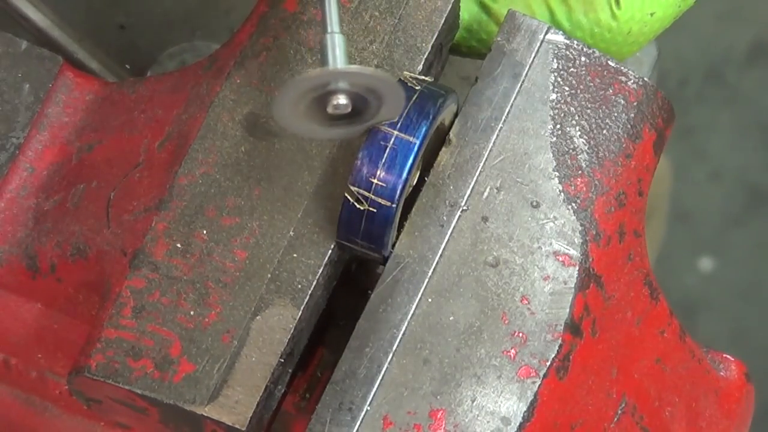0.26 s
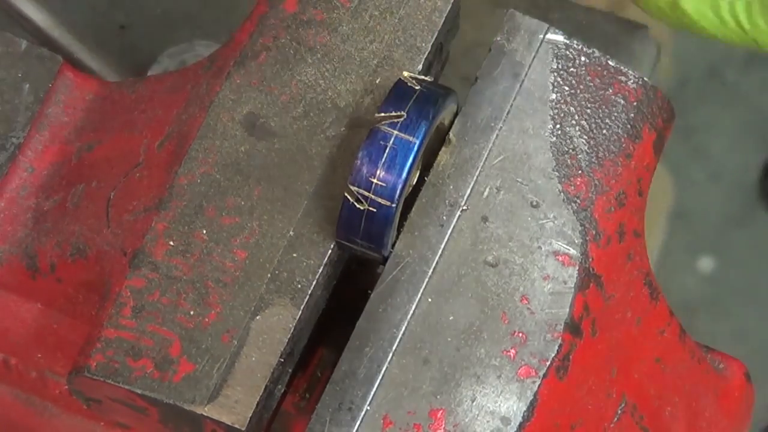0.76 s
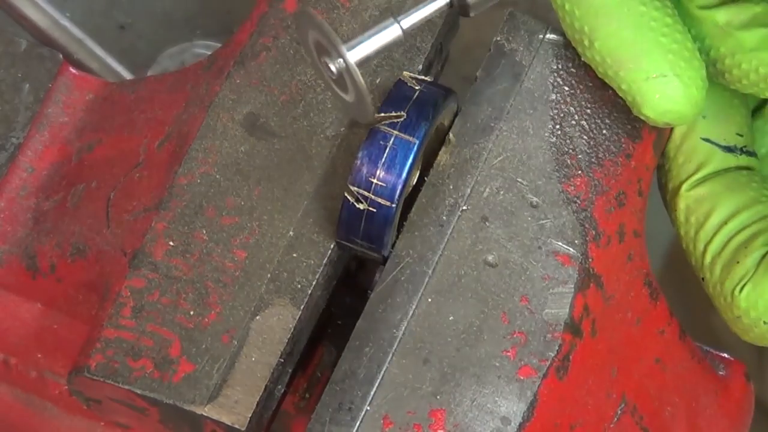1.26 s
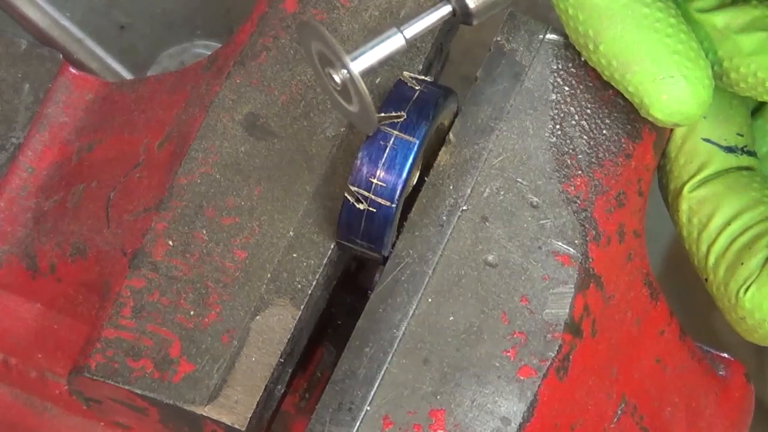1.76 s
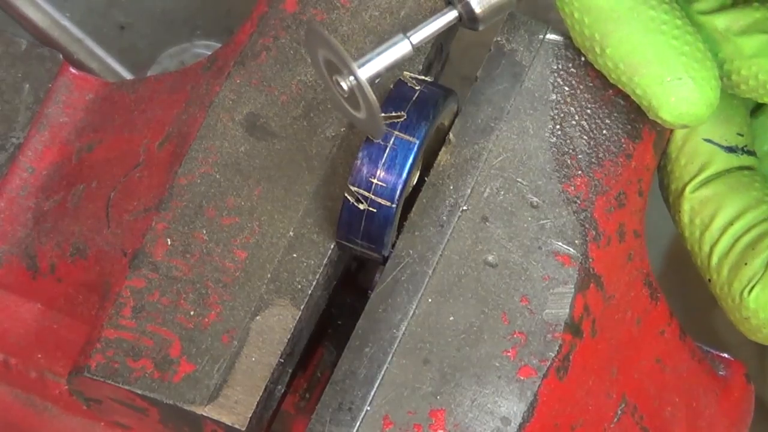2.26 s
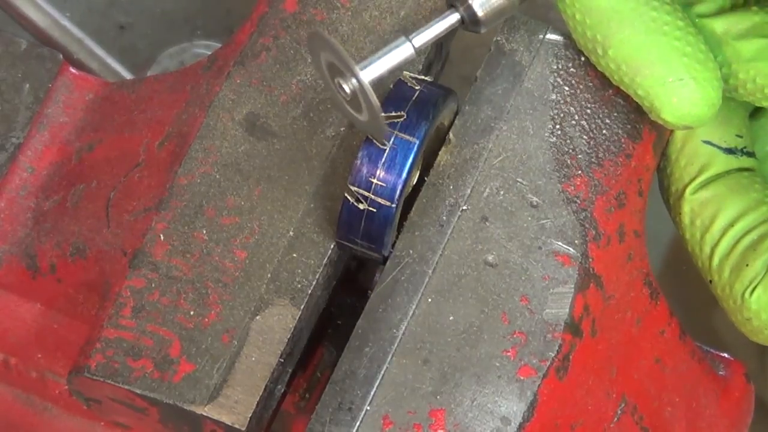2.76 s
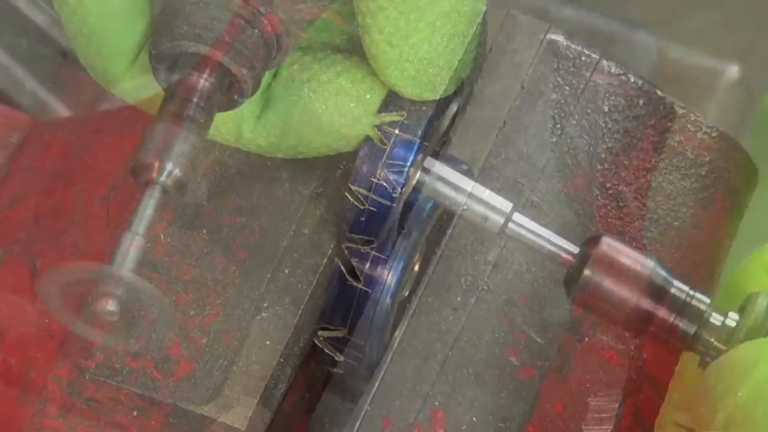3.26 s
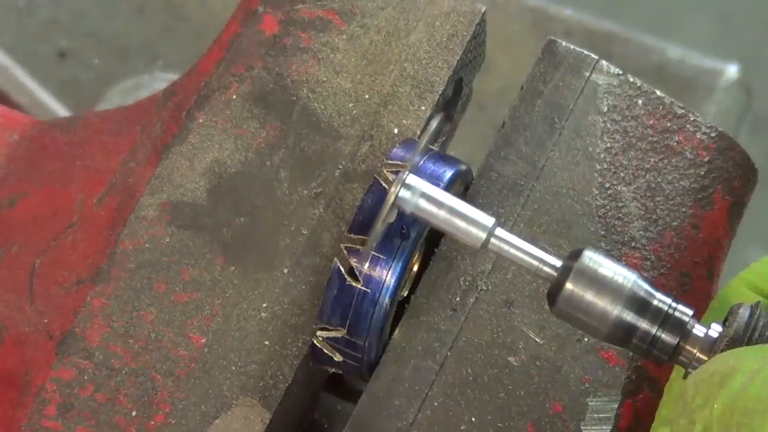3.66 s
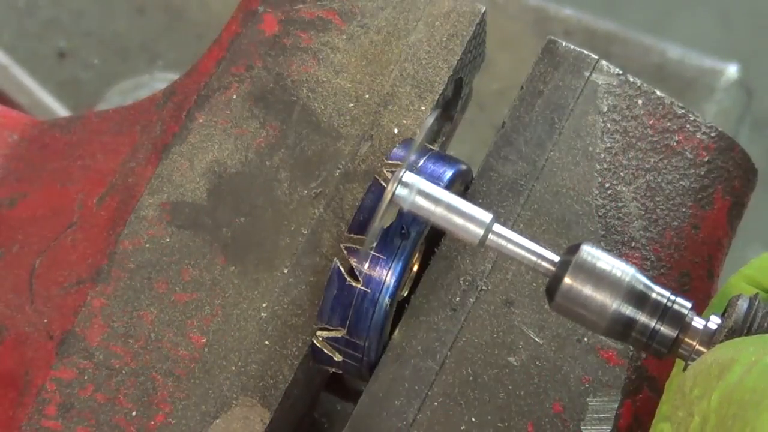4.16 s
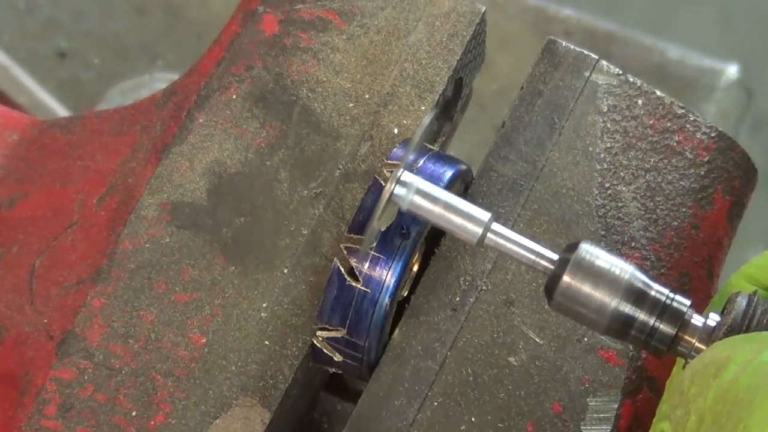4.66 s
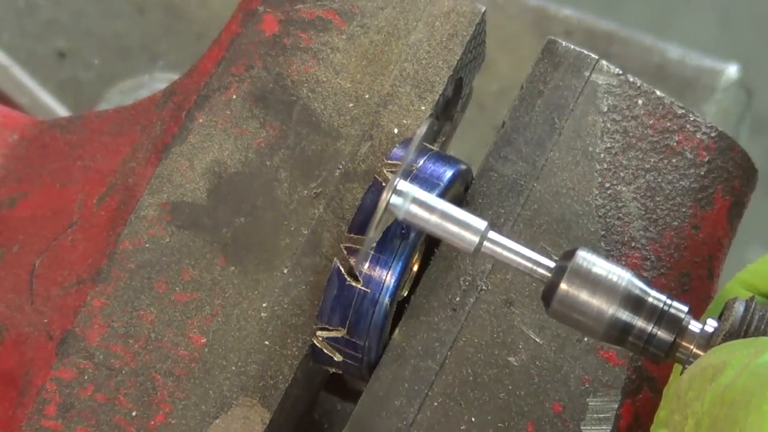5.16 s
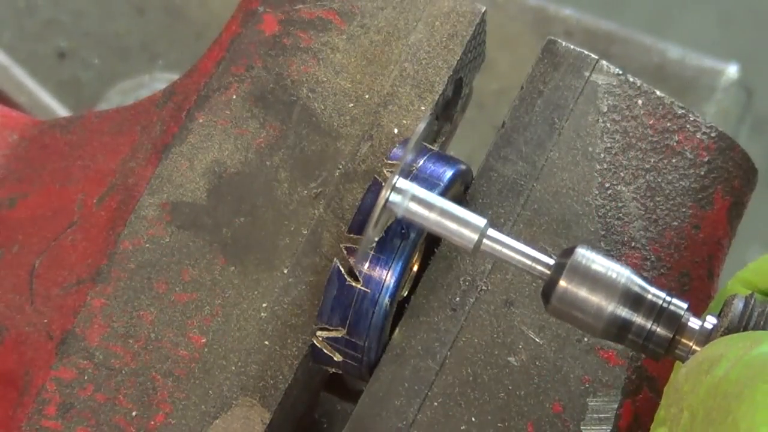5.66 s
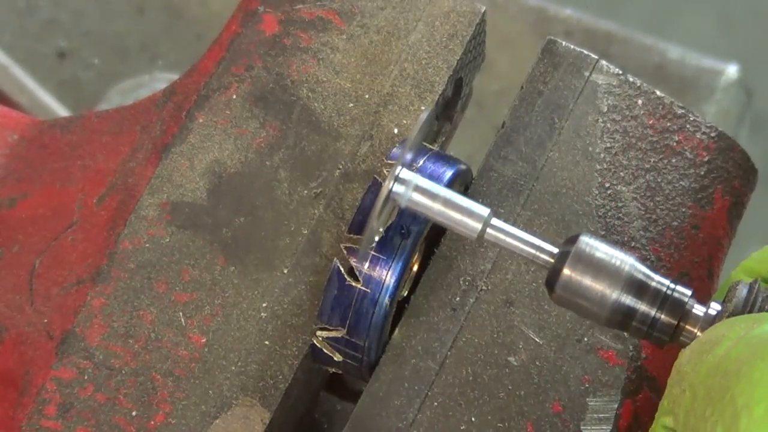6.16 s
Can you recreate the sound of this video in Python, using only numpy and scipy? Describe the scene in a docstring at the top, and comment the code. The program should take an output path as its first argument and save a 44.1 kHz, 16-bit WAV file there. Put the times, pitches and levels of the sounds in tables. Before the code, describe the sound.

A thin cut-off disc grinds hard metal, heard near the microphone in a workshop with little echo. Three shrill, rough cuts alternate with two smoother free-running whines full of airy hiss and a steady motor hum. Each cut drags the pitch down while buzzing overtones flare and waver; each release lets it climb again. The last cut is longest and strongest, stopping abruptly while still straining, over a weak wavering drone.

```python
"""A high-speed rotary tool cuts a metal ring held in a vise, over a low rumble and a wavering drone. It starts
in the cut: the disc rubs once a turn and sings a stack of shaft orders that sink with the load. Lifted free,
the motor spins up: its imbalance hums, its windings whine and the disc hisses in the air. The disc touches,
digs in and sinks in pitch once more, then lifts. As the first pass fades out, a second fades in: the tool runs
free for a moment, then bites and labours lower and lower until the end."""
import sys
import numpy as np
from scipy import signal
from scipy.fft import rfft, irfft, next_fast_len
from scipy.io import wavfile
from scipy.ndimage import uniform_filter1d

SR = 44100
rng = np.random.default_rng(int(sys.argv[2]) if len(sys.argv) > 2 else 0)


def transcribe(u):
    """Save the signal u as a 16-bit wav file named by the first command-line argument.

    u: samples, shape (n,) or (channels, n), limited to [-1, 1]; the rate is SR.
    q: integer samples, one column per channel.
    """
    v = np.clip(np.atleast_2d(u).T, -1, 1)
    q = np.round(v * 32767).astype(np.int16)
    wavfile.write(sys.argv[1], SR, q)


N = 283122
STEP = 40   # samples between control points
RIPPLE_HZ = 360   # ripple of the rectified supply


def from_db(db):
    """Decibels to gain."""
    return 10 ** (np.asarray(db) / 20)


def rms_one(x):
    """Scaled to rms 1."""
    return x / np.sqrt(np.mean(x ** 2) + 1e-20)


def fill(control, size):
    """Control points joined sample by sample."""
    return np.interp(np.arange(size) / STEP, np.arange(len(control)), control)


def read_table(time, rows):
    """The second column of a table that starts with seconds, read at the given times."""
    return np.interp(time, *np.transpose(rows))


def at_hz(points, hz):
    """A (Hz, value) table read on a log-frequency axis."""
    table = np.array(points)
    return np.interp(np.log(hz), np.log(table[:, 0]), table[:, 1])


def modes_db(modes, hz):
    """Lift in dB from a set of resonances, strongest at each centre."""
    return sum(db / (1 + (2 * (hz - centre) / width) ** 2) for centre, width, db in modes)


def swells(time, s, length, db):
    """Bell-shaped swells in dB, one row for each event."""
    from_middle = (time - np.array(s)[:, None]) / np.array(length)[:, None]
    return np.array(db)[:, None] * np.exp(-from_middle ** 2)


def drift(rate, size):
    """Slow chance at the control points: noise through a double one-pole low-pass at rate Hz; rms 1."""
    r = np.exp(-2 * np.pi * STEP * rate / SR)
    chance = signal.lfilter([1], [1, -2 * r, r * r], rng.standard_normal(size + 1000))
    return rms_one(chance[1000:])   # the filter has settled by then


# How alike the left and right noise are. Each row: pitch in Hz, likeness from 0 to 1.
LIKENESS = [(60, 1), (120, 0.97), (240, 1), (480, 0.45), (950, 1), (1890, 1), (3770, 0.85), (7520, 1),
            (15000, 0.98)]


def noise(spectrum, size):
    """Coloured stereo noise whose channels are alike by band; rms 1."""
    padded = next_fast_len(size)
    hz = np.maximum(np.arange(padded // 2 + 1) * SR / padded, 1)
    mid, side = rfft(rng.standard_normal((2, padded))) * from_db(at_hz(spectrum, hz))
    alike = np.clip(at_hz(LIKENESS, hz), 0, 1)
    pair = np.sqrt(1 + alike) * mid + np.sqrt(1 - alike) * side * np.array([[1], [-1]])
    return rms_one(irfft(pair, padded)[:, :size])


def tone(phase, rms_db, spread):
    """A sine that reaches the two microphones with a small, slowly wandering phase gap."""
    gap = fill(spread * (rng.standard_normal() + 0.24 * drift(0.72, len(rms_db))), len(phase))
    start = rng.uniform(0, 2 * np.pi)
    pair = (phase + start) % (2 * np.pi) + gap * np.array([[1], [-1]])
    return np.sqrt(2) * fill(from_db(rms_db), len(phase)) * np.sin(pair.astype(np.float32))


# Noise colours of the rumble and the drone. Each row: pitch in Hz, relative level in dB per Hz.
RUMBLE_COLOUR = [(12, -34), (20, -3), (64, -15.5), (103, -6), (129, -10), (145, -12), (162, -5.5),
                 (201, -9), (263, -3), (330, -8), (365, -4), (414, -8.5), (600, -6.5), (780, -10),
                 (1320, -120)]
DRONE_COLOUR = [(110, -27), (132, -0.5), (140, -22), (148, -13), (175, -41)]
# Low levels in dB before they swell with the hiss: rumble free, rumble in the cut,
# drone free, drone in the cut.
FIRST_LOWS_DB = (-93, -97, -94.5, -101)
SECOND_LOWS_DB = (-86.5, -90.5, -95, -94.5)
LOWS_FOLLOW, LOWS_HISS_DB = 0.47, -57.5   # share of the hiss's swing about this level


def lows(hiss_db, contact, lows_db, size):
    """Rumble and a wavering drone: two bands of noise that swell with the tool."""
    out = 0
    for colour, free_db, cut_db in [(RUMBLE_COLOUR, *lows_db[:2]), (DRONE_COLOUR, *lows_db[2:])]:
        swell_db = LOWS_FOLLOW * (hiss_db - LOWS_HISS_DB)
        level_db = swell_db + free_db + (cut_db - free_db) * contact + 0.8 * drift(1.0, len(contact))
        out = out + fill(from_db(level_db), size) * noise(colour, size)
    return out


# Shaft speed while the disc bites, one list a bite. Each row: time in seconds, speed in turns per second.
FIRST_BITES = [
    [(0.0, 839.5), (0.08, 785.2), (0.24, 739.3), (0.32, 727.7), (0.4, 706.6), (0.48, 689.5), (0.56, 685.9),
     (0.615, 685.9)],
    [(1.495, 1084.5), (1.59, 1077.1), (1.675, 1061.6), (1.76, 1051.1), (1.845, 1033.7), (1.93, 998.8),
     (2.015, 962.3), (2.27, 871.1), (2.355, 836.3), (2.44, 811.2), (2.525, 800.1), (2.695, 784.6),
     (2.828, 782.0)],
]
SECOND_BITES = [
    [(3.59, 1088.0), (3.67, 1082.1), (3.75, 1081.1), (3.83, 1070.7), (3.99, 1033.4), (4.07, 1009.2),
     (4.31, 955.2), (4.47, 914.5), (4.55, 903.3), (4.71, 887.6), (4.95, 913.1), (5.03, 896.4),
     (5.27, 828.1), (5.43, 803.0), (5.51, 793.0), (5.75, 777.7), (5.91, 740.5), (5.99, 734.9),
     (6.07, 738.3), (6.15, 729.3), (6.23, 714.9), (6.31, 685.5), (6.39, 671.3), (6.5, 655.0)],
]
# Each bite starts as a light touch, then the disc digs in: one time in seconds for each bite.
FIRST_DIGS_S = [-0.1, 1.66]
SECOND_DIGS_S = [3.8]
FIRST_FREE_SPEED, SECOND_FREE_SPEED = 1086.5, 1088.3   # turns per second
SPIN_UP_S, SETTLE_S = 0.187, 0.52   # the gap to free speed closes exponentially, then faster near the top
TOUCH_SHARE = 0.58   # contact of the light touch
TOUCH_IN_S, BITE_IN_S, LIFT_S = 0.02, 0.11, 0.0087   # slopes: seconds per whole unit of contact


def load(time, bites, digs, free_speed):
    """Shaft speed and contact (0-1): the bites drag the shaft down, after each lift it spins up again."""
    shaft, contact = np.full(len(time), free_speed), np.zeros(len(time))
    for bite, dig in zip(bites, digs):
        s, speed = np.transpose(bite)
        since = np.maximum(time - s[-1], 0)
        gap = (free_speed - speed[-1]) * np.exp(-since / SPIN_UP_S - (since / SETTLE_S) ** 3)
        dragged_or_free = np.where(since > 0, free_speed - gap, np.interp(time, s, speed))
        shaft = np.where(time < s[0], shaft, dragged_or_free)
        touch = np.clip((time - s[0]) / TOUCH_IN_S, 0, TOUCH_SHARE)
        sunk = touch + np.clip((time - dig) / BITE_IN_S, 0, 1)
        lifting = (s[-1] - time) / LIFT_S + 0.5
        contact = np.maximum(contact, np.clip(np.minimum(sunk, lifting), 0, 1))
    return uniform_filter1d(shaft, size=44), contact   # the rotor's inertia rounds every change of speed


# Hiss colours in the air and in the cut. Each row: pitch in Hz, relative level in dB per Hz.
FIRST_AIR = [(130, -58), (700, -18.5), (1300, -12), (1900, -8), (2600, -8), (3300, 1.5), (4300, 0.5),
             (5500, -0.5), (7000, -1), (8200, -5), (9800, -4.5), (11500, -0.5), (13500, 0.5), (15600, 0.5)]
FIRST_GRIND = [(130, -31), (700, -23), (1300, -17.5), (1900, -17), (2600, -17.5), (3300, -7.5), (4300, -8),
               (5500, -9), (7000, 2), (8200, -15.5), (9800, 2.5), (11500, -4.5), (13500, -1.5),
               (15600, -9.5)]
SECOND_AIR = [(130, -74), (700, -11.5), (1300, -8), (1900, -5.5), (2600, 2), (3300, 6.5), (4300, -3.5),
              (5500, 2), (7000, -5.5), (8200, 0.5), (9800, 4.5), (11500, -0.5), (13500, 2.5), (15600, 1.5)]
SECOND_GRIND = [(130, -26), (700, -26.5), (1300, -9), (1900, -7), (2600, -4), (3300, 2.5), (4300, -8.5),
                (5500, -5), (7000, 5), (8200, -19), (9800, 3), (11500, 3), (13500, -3.5), (15600, -2.5)]
# Motor roar, the lower part of the hiss. Each row: time in seconds, level in dB against the upper hiss.
ROAR = [(0.0, -7.5), (0.4, -3), (0.64, -1.5), (0.8, -1), (1.1, -4.5), (1.5, -4), (1.62, 4.5), (2.0, -3),
        (2.9, -3.5), (3.5, -1.5), (3.84, -2.5), (4.6, 2.5), (5.15, 0.3), (5.3, 2.5), (6.1, 1.5), (6.42, 8)]
ROAR_HZ = 5150   # the roar lies below this


def hiss(time, turns, ripple, hiss_db, contact, air, grind):
    """Air hiss throbs with the ripple; in the cut it gives way to grit noise pulsed once a turn."""
    size, points = len(turns), len(contact)
    blown = np.sqrt(1 - contact) * from_db(hiss_db + 0.8 * drift(12.0, points))
    grit_db = hiss_db + 1.2 * drift(23.0, points) + 0.8 * drift(55.0, points)
    ground = np.sqrt(contact) * from_db(grit_db)
    both = noise(air, size) * (1 + 0.15 * np.cos(ripple)) * fill(blown, size)
    both = both + noise(grind, size) * (1 + 0.46 * np.cos(turns)) * fill(ground, size)
    roar = signal.sosfiltfilt(signal.butter(2, ROAR_HZ, fs=SR, output="sos"), both)
    return both + roar * (fill(from_db(read_table(time, ROAR)), size) - 1)


def imbalance_hum(turns, ripple, once_db, twice_db, contact):
    """The off-balance rotor shakes once and twice a turn; the supply ripple adds two side lines."""
    points = len(contact)
    wander_db = 0.5 * drift(30.0, points) + 3.6 * contact * drift(4.5, points)
    hum = tone(turns, once_db + wander_db, spread=0.33)
    hum = hum + tone(turns + ripple, once_db - 20.5, spread=0.37)
    hum = hum + tone(turns - ripple, once_db - 38.5, spread=0.3)
    return hum + tone(2 * turns, twice_db + 1.57 * drift(22.0, points), spread=0.25)


# Tones of the free-running motor. Each row: multiple of the shaft rate, level in dB against the hiss
# once the motor runs freely.
FIRST_FREE = [(4, -27.5), (5, -16.5)]
SECOND_FREE = [(3, -19.5), (4, -18), (5, -12.5), (13, -31), (14, -13)]


def free_tones(turns, hiss_db, dug, straining, free_orders):
    """Shaft multiples of the free motor, weaker while it spins up and far weaker once the disc digs in."""
    out = 0
    for order, db in free_orders:
        level_db = hiss_db + db - 30 * dug - 12 * straining + 0.66 * drift(12.0, len(dug))
        out = out + tone(order * turns, level_db, spread=0.11)
    return out


# Whine lines: base levels in dB against the whole whine, from five ripple steps under the pole order
# to four above.
FIRST_WHINE_DB = [-12.5, -10, -10, -1.5, -5.5, 2.5, -1.5, 2.5, -9, 1]
SECOND_WHINE_DB = [-12, -18, -24.5, -17, -11.5, -2.5, -3.5, 0, -4.5, -1.5]
# The housing lifts the lines that cross it. Each row: centre in Hz, width in Hz, lift in dB.
HOUSING_MODE = [(7120, 560, 12)]
POLE_ORDER = 8   # commutations a turn
CHIRP_ORDER = 18.2   # a thin high whistle of the free motor, in multiples of the shaft rate
FREE_WHINE_DB, CUT_WHINE_DB = -16.5, -9   # whine against the hiss
SPIN_UP_WHINE_DB = 11.5   # extra while the windings work hardest, far below free speed


def whine(turns, shaft, ripple, hiss_db, dug, straining, lines_db):
    """The ripple chops the commutation tone into a comb; a blurred second comb sits an octave up."""
    out, size, points = 0, len(turns), len(shaft)
    whine_db = hiss_db + FREE_WHINE_DB + SPIN_UP_WHINE_DB * straining
    whine_db = whine_db + (CUT_WHINE_DB - FREE_WHINE_DB) * dug + 4.0 * dug * drift(7.8, points)
    smoothing = 1 - (shaft / shaft.max()) ** 4 * (1 - dug)   # a loaded motor smooths the ripple
    for step, db in enumerate(lines_db, -5):
        hz = POLE_ORDER * shaft + step * RIPPLE_HZ
        narrowing_db = 3.8 * max(step, -0.3 * step) * smoothing   # the outer lines sink most
        level_db = whine_db + db - narrowing_db + modes_db(HOUSING_MODE, hz) + 2.0 * drift(36.0, points)
        out = out + tone(POLE_ORDER * turns + step * ripple, level_db, spread=0.27)
    for step in range(4):
        blur = fill(0.5 * drift(40.0, points), size)   # radians
        phase = 2 * POLE_ORDER * turns + step * ripple + blur
        out = out + tone(phase, whine_db + 0.5 - 12 * dug, spread=0.22)
    blur = fill(0.9 * drift(60.0, points), size)
    return out + tone(CHIRP_ORDER * turns + blur, whine_db - 7.0 - 30 * dug, spread=0.25)


# The disc skips: the cut changes level for a moment, nearly always dipping.
# Each row: middle in seconds, length in seconds to each side, change in dB.
SKIPS = [(0.465, 0.023, 2.5), (1.633, 0.013, -3.5), (1.876, .018, -5), (2.175, 0.024, -6),
         (2.396, 0.05, -3.5), (2.645, 0.028, -4), (3.723, .025, -6), (4.12, .03, -4.5), (4.44, 0.015, -1.5),
         (4.723, 0.027, -2), (5.196, 0.0072, -4), (5.52, 0.059, -2.5), (6.004, 0.037, -3)]


def skips_db(time):
    """Level change in dB as the skipping disc loosens or tightens its rub."""
    return swells(time, *np.transpose(SKIPS)).sum(axis=0)


# Orders near one pitch flare up as the disc catches; a few sink instead.
# Each row: middle in seconds, pitch in Hz, length in seconds to each side, lift in dB.
FLARES = [(0.056, 7150.0, 0.029, 12), (0.085, 11500, 0.046, 3), (0.122, 10810.0, 0.03, 5.8),
          (0.145, 7600, 0.036, 18), (0.174, 6850.0, 0.037, 12), (0.284, 11700, 0.058, 9.5),
          (0.299, 5860.0, 0.055, 12), (0.319, 14000, 0.039, 14), (0.332, 9430.0, 0.052, 5),
          (0.34, 8750, 0.053, 10), (0.427, 5500, 0.039, 13.5), (0.54, 11670.0, 0.047, 11.5),
          (0.554, 12400, 0.061, 8), (1.553, 7650, 0.12, 11.5), (1.6, 4310.0, 0.075, 8.5),
          (1.663, 11700, 0.027, 11.5), (1.741, 7300, 0.058, 11), (1.79, 6320, 0.11, 8.5),
          (1.818, 4060, 0.11, 13.5), (1.821, 7280.0, 0.026, 2), (1.821, 12500, 0.049, 1),
          (1.831, 9400, 0.064, 7), (1.831, 14700, 0.036, 2), (1.913, 13200, 0.029, 2),
          (1.92, 5900, 0.09, 9.5), (1.966, 6860, 0.047, 12), (1.985, 8900, 0.056, 12),
          (1.99, 11500, 0.014, 1), (2.065, 9100, 0.14, 10.5), (2.12, 7410.0, 0.037, -3),
          (2.235, 8800, 0.033, 12), (2.317, 3400.0, 0.071, 6), (2.43, 2500, 0.2, 14),
          (2.517, 5700, 0.061, 8.5), (2.524, 8930, 0.17, 9), (2.656, 11700, 0.073, 2),
          (2.82, 11800.0, 0.024, 10.5), (3.63, 10850.0, 0.02, 10.5), (3.64, 4350.0, 0.063, 23),
          (3.762, 4330, 0.079, 23.5), (3.896, 11630.0, 0.058, 3.5), (3.92, 10400, 0.088, 2.5),
          (4.036, 10100, 0.036, 12.5), (4.1, 4100, 0.36, 8), (4.143, 14500, 0.044, 18),
          (4.173, 6890.0, 0.047, 12.5), (4.2, 9700, 0.039, 10), (4.258, 11630.0, 0.049, 5),
          (4.267, 10670, 0.046, 7.6), (4.483, 10150, 0.074, 15.5), (4.545, 10850.0, 0.054, 4),
          (4.597, 11700, 0.065, 8.5), (4.63, 7180, 0.036, -9), (4.644, 9860.0, 0.029, 3),
          (4.949, 10030.0, 0.049, 18.5), (5.028, 14400, 0.063, 5), (5.067, 7100, 0.11, 8.5),
          (5.11, 6100, 0.054, 11), (5.294, 2480, 0.1, 4.5), (5.394, 10510.0, 0.048, 2.5),
          (5.433, 12050, 0.14, 8), (5.473, 3130, 0.053, 14), (5.502, 2350, 0.097, 8.5),
          (5.657, 10500, 0.049, 7), (5.737, 3120, 0.052, 10), (5.802, 10200, 0.059, 10.5),
          (5.84, 2300, 0.14, 3), (5.926, 11080, 0.08, -2), (6.193, 7300, 0.067, 4), (6.2, 2830, 0.089, 8.5),
          (6.2, 10600, 0.06, 5), (6.269, 9750, 0.019, 5), (6.36, 10100, 0.054, 4)]
FLARE_HZ = 450   # reach of a flare in pitch


def flares_db(time, hz):
    """Lift of an order by the flares that it passes through."""
    s, centre, length, db = np.transpose(FLARES)
    coarse = slice(None, None, 8)   # every eighth control point is enough
    nearness = np.exp(-((hz[coarse] - centre[:, None]) / FLARE_HZ) ** 2)
    lift = swells(time[coarse], s, length, db) * nearness
    return np.interp(time, time[coarse], lift.sum(axis=0))


# Colour of the rubbing in seven groups of orders: relative level of each group in dB.
FIRST_RUB_DB = [-15, -8, 1.5, -5.7, 0.2, -6, 1.7]
SECOND_RUB_DB = [-2.5, -9.5, -2.5, -5, 5, 3.5, 1.5]


def rub_bands(time, rub_db, colour_db, contact):
    """Level of each group of rubbing orders: pressure, colour and slow chance; far weaker off the metal."""
    off_metal = np.clip(1 - contact / TOUCH_SHARE, 0, 1)
    return [rub_db + db + 2.5 * drift(5.6, len(time)) - 35 * off_metal for db in colour_db]


# Centres of the seven groups of rubbing orders, in Hz.
RUB_BANDS_HZ = [2600, 4000, 5600, 7200, 10200, 12200, 14600]
# Ring and disc lift the orders that cross them. Each row: centre in Hz, width in Hz, lift in dB.
FIRST_MODES = [(3290, 1200, 11.5), (6930, 920, 9.5), (8220, 300, 16.5), (11820, 1570, 16)]
SECOND_MODES = [(3170, 500, 4.9), (5720, 270, 5.7), (6300, 1700, 2.7), (9765, 480, 2.94), (10524, 760, 7.1),
                (10890, 260, 2.85)]
RIPPLE_SWING = 0.02   # radians the disc runs ahead and behind


def rubbing(time, turns, shaft, bands_db, modes, ripple):
    """Orders from 3 up; each wanders as the contact patch shifts, all throb with the torque ripple."""
    out, points = 0, len(shaft)
    together = drift(30.0, points) + 1.2 * drift(76.0, points)
    # the torque ripple shakes the disc: side lines grow with the order
    turns = turns + RIPPLE_SWING * np.sin(ripple)
    for order in range(3, 24):
        hz = order * shaft
        place = np.interp(np.log(hz), np.log(RUB_BANDS_HZ), range(len(RUB_BANDS_HZ)))
        # blend the two nearest groups
        band_db = sum(np.maximum(1 - np.abs(place - k), 0) * db for k, db in enumerate(bands_db))
        restless = 0.65 + 0.055 * place   # short waves feel the shifting contact most
        alone = drift(7.0, points) + 0.7 * drift(35.0, points)
        wander_db = 2.7 * restless * (alone + 0.45 * together)
        level_db = band_db + modes_db(modes, hz) + flares_db(time, hz) - 4.5 + wander_db
        out = out + tone(order * turns, level_db, spread=0.33)
    return out * (1 + 0.1 * np.cos(ripple))


# The tool moves in the hand. Each row: time in seconds, left minus right in dB.
PLACE = [(0.0, 0.4), (0.79, -0.2), (1.38, -1), (1.57, -0.4), (2.77, 0), (2.9, -2), (3.79, -2.5),
         (4.06, -1.5), (6.42, -1.5)]
SPIN_UP_GAP = 0.22   # share of free speed missing when the motor strains fully


def tool_pass(rows, bites, digs, free_speed, rub_colour_db, modes, lines_db, air, grind, free_orders,
              lows_db):
    """One pass from its first row to its last: a shared shaft phase and contact drive every sound."""
    s, *columns = np.transpose(rows)
    first, last = int(max(s[0], 0) * SR), min(int(s[-1] * SR), N)
    size = last - first
    time = np.arange(first, last + STEP, STEP) / SR
    once_db, twice_db, rub_db, hiss_db = [np.interp(time, s, column) for column in columns]
    skip_db = skips_db(time)
    rub_db, hiss_db = rub_db + skip_db, hiss_db + 0.78 * skip_db

    shaft, contact = load(time, bites, digs, free_speed)
    dug = np.clip((contact - TOUCH_SHARE) / (1 - TOUCH_SHARE), 0, 1)   # past the light touch
    straining = np.clip((1 - shaft / free_speed) / SPIN_UP_GAP, 0, 1) * (1 - contact)
    turns = 2 * np.pi * np.cumsum(fill(shaft, size)) / SR
    ripple = 2 * np.pi * RIPPLE_HZ * np.arange(first, last) / SR

    sound = hiss(time, turns, ripple, hiss_db, contact, air, grind)
    sound = sound + imbalance_hum(turns, ripple, once_db, twice_db, contact)
    sound = sound + free_tones(turns, hiss_db, dug, straining, free_orders)
    sound = sound + whine(turns, shaft, ripple, hiss_db, dug, straining, lines_db)
    bands_db = rub_bands(time, rub_db, rub_colour_db, contact)
    sound = sound + rubbing(time, turns, shaft, bands_db, modes, ripple)

    left_minus_right_db = fill(read_table(time, PLACE), size)
    sound = sound * from_db(left_minus_right_db * np.array([[0.5], [-0.5]]))
    sound = sound + lows(hiss_db, contact, lows_db, size)
    return np.pad(sound, ((0, 0), (first, N - last)))


# Base levels of each pass. Each row: time in seconds, once-a-turn hum in dB, twice-a-turn hum in dB,
# rubbing orders in dB, hiss in dB.
FIRST_PASS = [(0.0, -86, -90, -70, -56.5), (0.16, -88, -86, -72.5, -62), (0.26, -93, -88, -72.5, -62),
              (0.4, -84.5, -79.5, -70, -62), (0.56, -76, -84.5, -75, -65.5), (0.6, -78, -81, -81.5, -58.5),
              (0.625, -80, -85, -64, -73), (0.66, -92, -93, -60, -65), (0.76, -81.5, -96, -69, -63.5),
              (0.91, -68.5, -91, -67, -57), (1.165, -54.5, -74.5, -66, -52.5),
              (1.5, -50.5, -72.5, -64, -49), (1.6, -52, -70, -60, -54), (1.68, -65.5, -73, -62.5, -60.5),
              (1.78, -72.5, -67, -62, -61), (1.88, -74, -71.5, -60, -57.5), (2.0, -78, -72.5, -62.5, -57),
              (2.15, -79.5, -76, -66, -59), (2.35, -95, -78.5, -66, -59), (2.52, -94.5, -84, -65.5, -65),
              (2.78, -92, -81, -69, -64), (2.82, -92, -77, -74.5, -59), (2.86, -85, -97, -65, -58),
              (2.96, -73.5, -82, -67, -58.5), (3.2, -64, -78, -67, -56.5), (3.4, -74, -95, -67, -78),
              (3.57, -92, -116, -65, -97)]
SECOND_PASS = [(2.82, -97, -94, -64, -86), (2.86, -68.5, -90, -64, -66), (3.03, -56, -73.5, -61, -51.5),
               (3.27, -52, -64, -70, -46.5), (3.35, -54.5, -62.5, -72, -45.5), (3.43, -48.5, -63, -64, -45),
               (3.55, -50, -60.5, -73, -45), (3.75, -57, -57, -64, -44.5), (3.84, -74, -55, -58.5, -52),
               (4.0, -83, -55.5, -59, -58), (4.1, -83, -50, -60.5, -52.5), (4.22, -74, -50, -62, -55),
               (4.32, -94, -56, -63.5, -57), (4.47, -75.5, -53, -64, -58),
               (4.72, -72.5, -58.5, -63.5, -60.5), (4.95, -76, -56, -62.5, -60.5),
               (5.1, -69, -54, -63, -55.5), (5.3, -82, -65.5, -62, -64.5),
               (5.43, -81.5, -59.5, -62.5, -60.5), (5.53, -89, -62, -62.5, -61),
               (5.75, -80.5, -59, -61.5, -61.5), (5.85, -83, -63.5, -59, -61),
               (6.0, -100, -63, -59.5, -61.5), (6.15, -90, -62.5, -60, -62), (6.3, -74, -54.5, -60, -60.5),
               (6.42, -75, -54, -59.5, -71)]


def scene():
    """Both passes, the first fading out as the second fades in."""
    first = tool_pass(FIRST_PASS, FIRST_BITES, FIRST_DIGS_S, FIRST_FREE_SPEED, FIRST_RUB_DB, FIRST_MODES,
                      FIRST_WHINE_DB, FIRST_AIR, FIRST_GRIND, FIRST_FREE, FIRST_LOWS_DB)
    second = tool_pass(SECOND_PASS, SECOND_BITES, SECOND_DIGS_S, SECOND_FREE_SPEED, SECOND_RUB_DB,
                       SECOND_MODES, SECOND_WHINE_DB, SECOND_AIR, SECOND_GRIND, SECOND_FREE,
                       SECOND_LOWS_DB)
    return first + second


CUTOFF_HZ = 15740


def record(dry):
    """The top is cut steeply."""
    return signal.sosfilt(signal.ellip(13, 0.5, 60, CUTOFF_HZ, fs=SR, output="sos"), dry)


dry = scene()
out = record(dry)
transcribe(out)
```